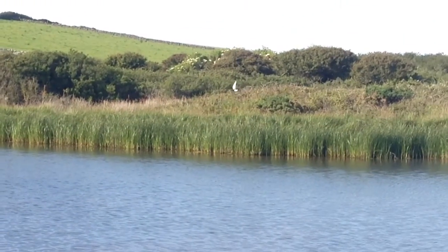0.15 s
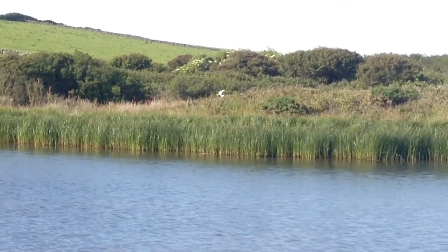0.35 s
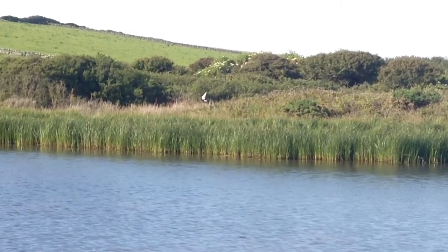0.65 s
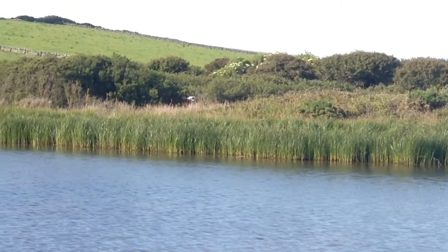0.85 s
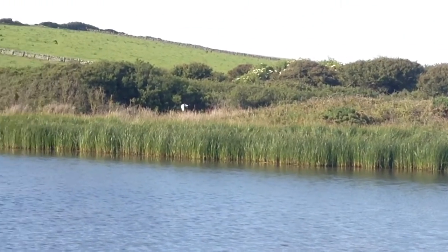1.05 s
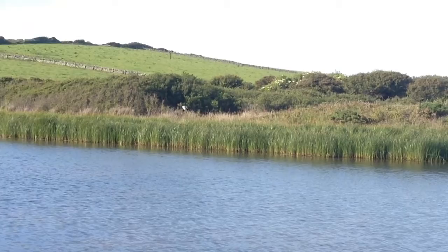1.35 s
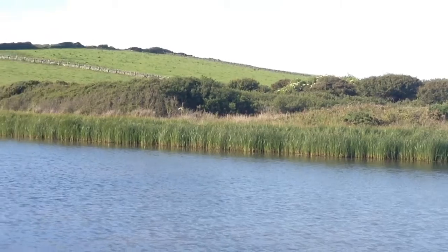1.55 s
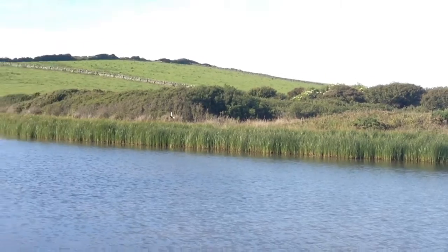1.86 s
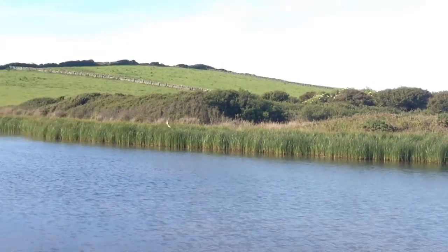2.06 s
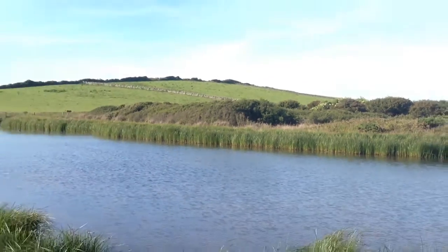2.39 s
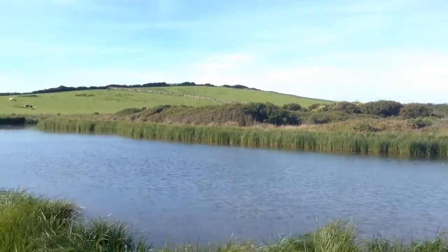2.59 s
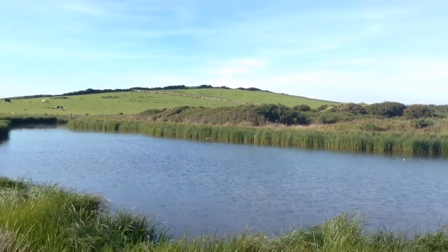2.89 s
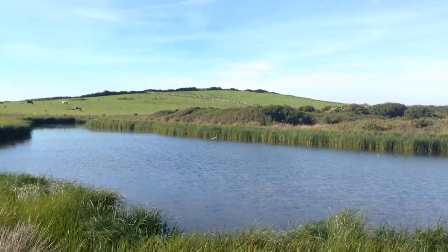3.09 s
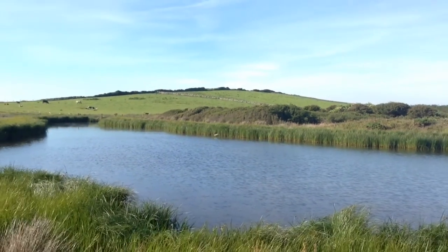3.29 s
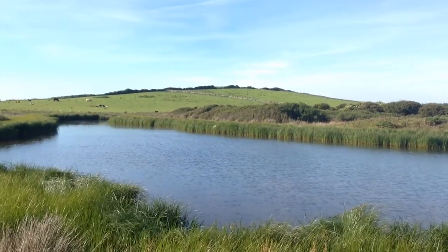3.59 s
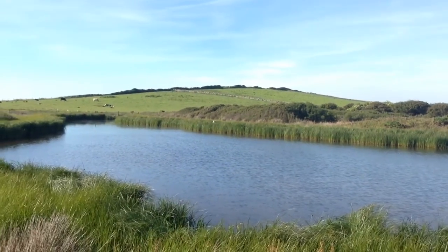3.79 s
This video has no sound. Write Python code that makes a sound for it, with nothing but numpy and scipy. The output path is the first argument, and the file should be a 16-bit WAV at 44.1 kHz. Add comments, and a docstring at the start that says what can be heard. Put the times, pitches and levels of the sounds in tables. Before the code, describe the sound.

Shore birds pipe rapid, shrill overlapping notes across a reedy lagoon, with faint wind rumble.

```python
"""Several shore birds pipe rapid arched notes over a reedy lagoon, overlapping one another: gliding near-sines.
Reeds and the hillside scatter the calls as a dying cloud of echoes, and farther birds pipe faintly behind.
Light wind rumbles on the microphone, with a wavering hum and a faint rustle and hiss: noise bands and a low tone.
The hand-held housing clicks and creaks a few times, in short gritty bursts of noise.
Later a farther bird trills higher up: a grainy whistle whose level pulses fast."""
import sys
import numpy as np
from scipy import signal
from scipy.io import wavfile

SR = 44100
rng = np.random.default_rng(int(sys.argv[2]) if len(sys.argv) > 2 else 0)


def materialize(psi):
    """Save the field psi as 16-bit PCM at rate SR to the path in sys.argv[1].

    A 1-D psi becomes a single channel; in a 2-D psi each row is a channel.
    """
    bounded = np.clip(np.atleast_2d(psi).T, -1, 1)
    quanta = np.round(bounded * 32767).astype(np.int16)
    wavfile.write(sys.argv[1], SR, quanta)


def gain_from_db(level_db):
    """Turn a decibel level (scalar or array-like) into a linear amplitude factor."""
    decades = np.asarray(level_db, float) / 20
    return 10 ** decades


N = 173754   # length of the scene [samples]

# Piped notes of the near birds: (start of the held top [s], top pitch [Hz], slide up [s], hold [s],
# slide down [s], level of the held first partial [dB rms], octave partial against the first [dB])
NOTES = [(-0.005, 3370, 0.008, 0.093, 0.018, -56.5, -13.5), (-0.01, 3100, 0.0079, 0.02, 0.02, -55, -8.5),
         (0.029, 3060, 0.008, 0.0035, 0.0079, -50.5, -15), (0.072, 3190, 0.016, 0.029, 0.018, -54, -14.5),
         (0.133, 3250, 0.014, 0.062, 0.02, -59.5, -11), (0.178, 3080, 0.014, 0.025, 0.035, -56.5, -32),
         (0.264, 3183, 0.0075, 0.03, 0.02, -51, -20.5), (0.356, 3165, 0.016, 0.037, 0.022, -57, -20),
         (0.397, 3240, 0.014, 0.049, 0.032, -64.5, -9), (0.4, 2850, 0.021, 0.063, 0.022, -62.5, -28),
         (0.509, 3216, 0.005, 0.035, 0.011, -61, -14), (0.524, 3150, 0.021, 0.045, 0.018, -60, -17),
         (0.638, 3210, 0.021, 0.043, 0.018, -60, -24), (0.698, 2655.0, 0.022, 0.011, 0.027, -66, -5),
         (0.748, 3205, 0.014, 0.028, 0.0066, -61.5, -12), (0.788, 3190, 0.014, 0.039, 0.03, -61, -8),
         (0.817, 2595.0, 0.011, 0, 0.01, -61, -18), (0.878, 3227, 0.012, 0.046, 0.015, -57, -14.5),
         (0.983, 3224, 0.015, 0.031, 0.026, -53.5, -11), (1.044, 3190, 0.014, 0.039, 0.035, -57.5, -19),
         (1.081, 2550, 0.008, 0.02, 0.015, -64, -11), (1.116, 3255, 0.012, 0.051, 0.019, -53.5, -9.5),
         (1.176, 3070, 0.017, 0.033, 0.015, -59, -13), (1.216, 2755.0, 0.02, 0.015, 0.034, -60.5, -13),
         (1.224, 3220, 0.014, 0.028, 0.015, -53, -4.5), (1.3, 3190, 0.023, 0.04, 0.015, -49.5, -9),
         (1.356, 3255, 0.014, 0.057, 0.016, -50.5, -4.5), (1.43, 3140, 0.0084, 0.033, 0.024, -51.5, -13),
         (1.471, 3250, 0.014, 0.021, 0.0092, -51.5, -5), (1.477, 2960, 0.025, 0, 0.029, -57, -11),
         (1.554, 3158, 0.033, 0.04, 0.014, -48.5, -12), (1.573, 3000, 0.018, 0.057, 0.023, -74, -2.0),
         (1.599, 3250, 0.014, 0.062, 0.012, -55, -11.5), (1.615, 3044, 0.022, 0.017, 0.038, -60.5, -7),
         (1.696, 3110, 0.012, 0.026, 0.008, -52, -17), (1.716, 3230, 0.008, 0.032, 0.025, -51, -19.5),
         (1.73, 3067, 0.012, 0.014, 0.008, -50, -14.5), (1.846, 2750, 0.014, 0.0067, 0.006, -68, -15),
         (1.874, 2740, 0.014, 0.043, 0.0081, -66, -22), (1.808, 3180, 0.03, 0.043, 0.022, -44, -14.5),
         (1.849, 3250, 0.014, 0.036, 0.03, -50, -29), (1.903, 2900.0, 0.012, 0.0068, 0.013, -68.5, -1),
         (1.946, 3186, 0.0074, 0.04, 0.057, -51.5, -18.5), (1.985, 2604, 0.015, 0.013, 0.041, -56.5, -8),
         (2.047, 2880, 0.012, 0.023, 0.008, -61.5, -13), (2.068, 3200, 0.026, 0.051, 0.015, -47.5, -14),
         (2.08, 3254, 0.014, 0.042, 0.026, -50.5, -11), (2.15, 2860, 0.005, 0.0043, 0.012, -59, -13),
         (2.128, 2870, 0.004, 0.008, 0.0058, -55, -16), (2.19, 3223, 0.008, 0.028, 0.0055, -50, -14.0),
         (2.213, 3095, 0.024, 0.04, 0.006, -57, -24), (2.267, 2806, 0.023, 0, 0.03, -51.5, -13.5),
         (2.314, 3143, 0.016, 0.043, 0.0051, -48.5, -11.5), (2.321, 3286, 0.014, 0.04, 0.015, -48, -10.5),
         (2.323, 2850.0, 0.016, 0.0019, 0.028, -60, -17), (2.393, 2885, 0.016, 0.0092, 0.025, -52.5, -20),
         (2.424, 3290, 0.007, 0.028, 0.0088, -53, -8.5), (2.44, 2246, 0.005, 0.018, 0.0074, -56, -17),
         (2.462, 3100, 0.0065, 0.039, 0.007, -55.5, -19), (2.519, 2890, 0.018, 0.0099, 0.031, -53, -14),
         (2.558, 3262, 0.01, 0.045, 0.008, -51.5, -11), (2.575, 3120, 0.024, 0.032, 0.013, -50.5, -11.5),
         (2.655, 2805, 0.021, 0.00061, 0.037, -50, -19), (2.668, 3280, 0.008, 0.033, 0.008, -54.5, -19),
         (2.705, 2485, 0.017, 0.0081, 0.021, -52.5, -17), (2.711, 3080, 0.011, 0.043, 0.005, -57.5, -15.5),
         (2.789, 2525.0, 0.019, 0.0047, 0.043, -55.5, -19), (2.809, 3350, 0.014, 0.033, 0.0102, -52, -14.5),
         (2.826, 3230, 0.014, 0.037, 0.015, -52, -14), (2.842, 2924, 0.021, 0.034, 0.015, -54.5, -31),
         (2.91, 2820, 0.012, 0.013, 0.027, -57, -19), (2.916, 3334, 0.014, 0.027, 0.036, -53.5, -12.0),
         (2.958, 2962, 0.021, 0, 0.031, -50.5, -27), (2.978, 3060, 0.007, 0.044, 0.021, -61, -20),
         (3.047, 3275, 0.014, 0.038, 0.035, -48, -19.5), (3.093, 2445, 0.021, 0.036, 0.0069, -60.5, -22),
         (3.12, 3200, 0.023, 0.018, 0.0084, -52, -40), (3.135, 3270, 0.015, 0.035, 0.019, -51, -13.5),
         (3.188, 3008, 0.015, 0.00048, 0.023, -48, -23), (3.262, 2600, 0.031, 0.003, 0.024, -56, -17),
         (3.275, 3050, 0.0055, 0.019, 0.006, -50.5, -19), (3.292, 3236, 0.005, 0.038, 0.008, -49, -20),
         (3.287, 3285, 0.008, 0.042, 0.02, -44.5, -17.5), (3.314, 3050, 0.011, 0, 0.006, -51, -23),
         (3.389, 3282, 0.014, 0.031, 0.019, -46, -13.5), (3.404, 3220, 0.022, 0.023, 0.0098, -41.5, -19),
         (3.421, 2880, 0.022, 0.0081, 0.012, -43.5, -31), (3.519, 3230, 0.028, 0.037, 0.0076, -44, -13.5),
         (3.556, 3368, 0.03, 0.11, 0.0063, -46.5, -19.5), (3.522, 3320, 0.012, 0.032, 0.015, -45, -17.5),
         (3.628, 3240, 0.013, 0.028, 0.0045, -49, -10), (3.654, 2960, 0.018, 0.0091, 0.006, -39.5, -24),
         (3.7, 2900, 0.004, 0.0039, 0.011, -47, -32), (3.668, 2560, 0.02, 0.0064, 0.012, -47, -16),
         (3.622, 2740, 0.025, 0.014, 0.026, -53, -32), (3.676, 3193, 0.006, 0.028, 0.004, -44, -15),
         (3.75, 3288, 0.019, 0.033, 0.0051, -42, -18), (3.765, 3200, 0.0087, 0.045, 0.011, -44.5, -17),
         (3.865, 3250, 0.012, 0.032, 0.012, -46.5, -12.5), (3.882, 3100, 0.013, 0.022, 0.0084, -39.5, -26),
         (3.906, 2403, 0.006, 0.019, 0.006, -52.5, -19), (3.93, 3245, 0.017, 0.0083, 0.01, -47, -13)]
SLIDE_DEPTH, SLIDE_CURVE = 0.3, 1.4   # share of the top pitch covered by a full slide, and its bend
FULL_SLIDE_S = 0.026                  # a shorter slide stops before it covers the whole depth
BOW, FULL_BOW_S = 0.0351, 0.031       # the hold is arched by this share once it lasts this long
SLIDE_LOSS_DB, OCTAVE_SLIDE_LOSS_DB = 15, 8.5   # loss at the foot of a full slide: odd partials, octave
FOOT = 0.13                           # part of the slide over which the note fades in or out
WOBBLE, FLUTTER_DB = 0.0048, 1.05     # unsteadiness of the pitch (share) and of the level
THIRD_DB = -39                        # third partial against the first
# Notes held above HIGH_REGISTER_HZ snap into their top: slides are weaker and jump across a gap.
# (time [s], slide loss [dB], jump [share of the slide], slide depth [share of the top pitch],
# sag at the end of the hold [share of the top pitch])
SNAP = [(0, 5.4, 0.42, 0.35, 0.028), (1.2, 11, 0.42, 0.35, 0.011), (1.999, 11.2, 0.44, .36, .015),
        (2.6, 4.7, 0.29, 0.36, 0.044), (3.2, 7.6, 0.327, .4, .075), (3.94, 5.7, 0.34, 0.39, 0.071)]
HIGH_REGISTER_HZ = 3040
SNAP_S, SAG_S = 0.0012, 0.00879       # time constants of the snap, and of the sag before the hold ends
SLIDE_FLUTTER_DB = 3                  # the slides of all notes are broken and uneven

# Echoes weaken as the birds come nearer: (time [s], level against the direct calls [dB])
SCATTER = [(0, -11), (2, -14.5), (3.2, -21), (3.94, -26)]
SCATTER_T60_S, SCATTER_DELAY_S = 0.15, 0.016   # time to die by 60 dB, and wait before the first echo

# Farther birds piping at loose intervals
FLOCK_PER_S, FLOCK_LOW_HZ, FLOCK_HIGH_HZ = 28, 2296, 2900
FLOCK_DB, FLOCK_SPREAD_DB, FLOCK_SCATTER_DB = -69, 9, -11   # middle level, spread either way, echoes

# Wind on the microphone, its strength: (time [s], level [dB rms])
GUST = [(0, -63), (.3, -66), (.58, -55.5), (.75, -65.5), (1.05, -58), (1.45, -57), (1.6, -54),
        (1.72, -58.5), (1.84, -55.5), (1.95, -62.5), (2.15, -60), (2.27, -59), (2.45, -62.5), (2.9, -62),
        (3.4, -62.5), (3.94, -63)]
# Wind on the microphone, its relative spectrum: (frequency [Hz], level per Hz [dB])
WIND = [(12, -53), (20, -26.5), (54, 0.5), (75, 3.5), (107, 0.5), (139, -11.5), (178, -16), (274, -27),
        (300, -14.5), (390, -61), (660, -120)]

# Strength of a low wavering hum: (time [s], level [dB rms])
HUM = [(0.0, -70), (0.31, -65.5), (0.48, -61), (1.66, -58.5), (2.48, -84), (2.64, -66.5), (3.92, -81),
       (3.94, -81)]
HUM_HZ, HUM_WAVER_HZ, HUM_THROB_DB = 74, 4.84, 1   # middle pitch, spread of pitch, spread of level

# Distant rustle and microphone hiss, relative spectrum: (frequency [Hz], level per Hz [dB])
AIR = [(120, -27), (200, -8.5), (400, -4.5), (800, -9.5), (1500, -14), (2500, -6), (3600, -15),
       (6300, -15.5), (9000, -17), (15500, -18.5)]
AIR_DB = -64.5   # rms

# Clicks of the housing: (time [s], peak level [dB], centre of the band [Hz], width of the band [octaves],
# time to die by 60 dB before the band filter [s])
CLICKS = [(.885, -50.5, 1760, 0.71, 0.0098), (.951, -39, 1920, 1.35, 0.048), (0.959, -44, 2180, 2.6, 0.027),
          (0.965, -37.5, 1560, 1.5, 0.055), (.967, -46, 700, 2.2, 0.037), (1.003, -45.5, 1800, 1.4, 0.2),
          (1.028, -38.5, 1890, 2.1, 0.034), (1.029, -38, 3200, 0.24, 0.015), (1.029, -51, 7900, 2.2, 0.048),
          (1.036, -43, 2200, 3.3, 0.035), (1.047, -47, 1130, 2, 0.13), (1.186, -48, 2000, 1.6, 0.072),
          (1.249, -48.5, 1420, 2.6, 0.048), (1.263, -43.5, 1710, 0.47, 0.028),
          (2.146, -48.5, 3160, 1.6, 0.074), (3.044, -40, 3770, 0.47, 0.024), (2.245, -57, 167, 0.54, 0.024),
          (3.06, -57.5, 357, 0.8, 0.043), (3.251, -51, 353, 0.42, 0.028)]
CLICK_ATTACK_S = 0.00071   # time constant of the onset

# Trills of the farther bird: (start [s], length [s], first pitch [Hz], last pitch [Hz],
# level before the pulsing and fading [dB rms])
TRILLS = [(2.684, .062, 4130, 3700, -66.5), (2.774, 0.026, 3940, 4020, -70), (2.94, 0.022, 3650, 3720, -71),
          (2.988, 0.055, 3760, 4000, -70.5)]
TRILL_PER_S, TRILL_DEPTH, TRILL_JITTER_HZ = 75, 0.9, 70   # pulses per second, their depth, pitch spread

CUTOFF_HZ = 15300   # top of the finished sound


def rms_one(x):
    """Scales to rms 1."""
    return x / np.sqrt(np.mean(x ** 2) + 1e-20)


def drift(rate):
    """Wandering chance with spread 1: noise smoothed twice so that little is left above rate, in Hz."""
    r = np.exp(-16 * np.pi * rate / SR)
    # Every eighth sample is enough; the first 4000 let the smoothing settle.
    noise = rng.standard_normal(N // 8 + 4002)
    slow = signal.lfilter([1], [1, -2 * r, r * r], noise)[4000:]
    return np.interp(np.arange(N) / 8, np.arange(len(slow)), rms_one(slow - slow.mean()))


def follow(table):
    """Joins the (time, value) points of a table by straight lines over the scene."""
    return np.interp(np.arange(N) / SR, *np.transpose(table))


def band(x, low_hz, high_hz):
    """Keeps the sound between two frequencies (Butterworth band-pass)."""
    edges = [low_hz, min(high_hz, 0.45 * SR)]
    return signal.sosfilt(signal.butter(2, edges, "band", fs=SR, output="sos"), x)


def banded_noise(spectrum, edges, shared_db, own_db, rate, calm_hz):
    """Noise bands flickering partly together and partly alone, ever steadier above calm_hz; rms 1."""
    hz, db = np.transpose(spectrum)
    white = rng.standard_normal((2, N + SR))   # neighbouring bands use different noise
    together, out = drift(rate), 0
    for k, (low, high) in enumerate(zip(edges, edges[1:])):
        level = np.interp(np.log(low * high) / 2, np.log(hz), db)
        flicker = shared_db * together + own_db * drift(rate)
        flicker = flicker / (1 + (low / calm_hz) ** 2)
        settled = band(white[k % 2], low, high)[SR:]
        out = out + gain_from_db(level + flicker) * settled
    return rms_one(out)


def add(out, start, sound):
    """Mixes a sound in at a sample index, cut to the scene."""
    a, b = max(start, 0), min(start + len(sound), N)
    out[a:b] += sound[a - start:b - start]


def piping(notes):
    """Each note slides up, holds on an arch and slides down; nearly a sine with its octave."""
    out, wobble, broken = np.zeros(N), drift(68.0), drift(153.0)
    flutter, octave_flutter = drift(37.0), drift(42.0)
    snap_s, *snap = np.transpose(SNAP)
    turns = rng.random((len(notes), 2))   # starting phases
    for (s, hz, rise, hold, fall, db, octave_db), turn in zip(notes, turns):
        rise, hold, fall = max(rise, 0.003), max(hold, 0), max(fall, 0.003)
        first = int((s - rise) * SR)
        i = np.arange(first, int((s + hold + fall) * SR))
        t = i / SR - s   # 0 where the held top starts
        at = np.clip(i, 0, N - 1)

        # How far from the top: 0 on the hold, towards 1 at the foot of a slide
        gone = np.clip(np.maximum(-t / rise, (t - hold) / fall), 0, 1)
        slid = gone * np.minimum(np.where(t < 0, rise, fall) / FULL_SLIDE_S, 1)
        outside_s = np.maximum(0, np.maximum(-t, t - hold))
        off = 1 - np.exp(-outside_s / SNAP_S)

        # The snap values are all zero for the lower notes.
        snap_db, jump, depth, sag = [np.interp(s, snap_s, c) * (hz > HIGH_REGISTER_HZ) for c in snap]
        arch = np.clip(2 * t / max(hold, 1e-3) - 1, -1, 1) ** 2
        arch = arch * BOW * min(hold / FULL_BOW_S, 1)
        sink = sag * np.exp(-np.maximum(hold - t, 0) / SAG_S)
        slide = (depth or SLIDE_DEPTH) * (jump * off + (1 - jump) * slid ** SLIDE_CURVE)
        pitch = hz * (1 - arch - sink - slide + WOBBLE * wobble[at])
        phase = 2 * np.pi * (np.cumsum(pitch) / SR + turn[0])

        odd_level = gain_from_db(FLUTTER_DB * flutter[at] - SLIDE_LOSS_DB * slid)
        tone = odd_level * (np.sin(phase) + gain_from_db(THIRD_DB) * np.sin(3 * phase))
        octave_level = gain_from_db(octave_db + FLUTTER_DB * octave_flutter[at] - OCTAVE_SLIDE_LOSS_DB * slid)
        tone += octave_level * np.sin(2 * phase + 2 * np.pi * turn[1])
        slide_db = off * (SLIDE_FLUTTER_DB * broken[(at + first) % N] - snap_db)
        fade = np.clip((1 - gone) / FOOT, 0, 1)
        add(out, first, np.sqrt(2) * gain_from_db(db + slide_db) * fade * tone)
    return out


def scatter(x, level_db):
    """Reeds, bushes and slope return a dying cloud of small echoes."""
    t = np.arange(SR // 2) / SR
    dying = gain_from_db(-60 * t / SCATTER_T60_S)
    cloud = rng.standard_normal(len(t)) * dying * (t > SCATTER_DELAY_S)
    cloud = cloud / np.sqrt(np.sum(cloud ** 2))
    return gain_from_db(level_db) * signal.fftconvolve(x, cloud)[:N]


def flock():
    """Short notes from farther birds at loose intervals and random pitches, half lost in echoes."""
    notes = []
    chances = rng.random((200, 4))[:int(FLOCK_PER_S * N / SR)]
    for k, (when, length, height, loudness) in enumerate(chances):
        s = (k + when) / FLOCK_PER_S
        hz = FLOCK_LOW_HZ + (FLOCK_HIGH_HZ - FLOCK_LOW_HZ) * height
        db = FLOCK_DB + FLOCK_SPREAD_DB * (2 * loudness - 1)
        notes.append((s, hz, 0.016, 0.0145 * length, 0.024, db, -13))
    far = piping(notes)
    return far + scatter(far, FLOCK_SCATTER_DB)


def wind():
    """Wind on the microphone: low noise in third-octave bands that swells and sinks with the gusts."""
    edges = 20 * 2 ** (np.arange(14) / 3)
    rumble = banded_noise(WIND, edges, shared_db=1.2, own_db=1.5, rate=6.0, calm_hz=900)
    return gain_from_db(follow(GUST)) * rumble


def hum():
    """A low tone whose pitch and level waver."""
    level_db = follow(HUM) + HUM_THROB_DB * drift(9.3)
    pitch = HUM_HZ + HUM_WAVER_HZ * drift(4.01)
    return np.sqrt(2) * gain_from_db(level_db) * np.sin(2 * np.pi * np.cumsum(pitch) / SR)


def air():
    """Distant rustle and microphone hiss: third-octave noise bands, the lower ones flickering most."""
    edges = 150 * 2 ** (np.arange(21) / 3)
    return gain_from_db(AIR_DB) * banded_noise(AIR, edges, shared_db=3.0, own_db=2.05, rate=4.2, calm_hz=920)


def housing():
    """Each click is a gritty burst with a sharp head, dying fast in the band where the plastic shell rings."""
    out, t = np.zeros(N), np.arange(SR // 4) / SR
    grit = rng.random((len(CLICKS), 2, len(t)))
    for (s, db, hz, octaves, t60), (sign, size) in zip(CLICKS, grit):
        # Random signs and very uneven sizes make the grit.
        snaps = np.sign(sign - 0.5) * gain_from_db(-2.5 * np.log(size + 0.03))
        snaps = snaps * (1 - np.exp(-t / CLICK_ATTACK_S)) * gain_from_db(-60 * t / t60)
        burst = band(snaps, hz * 2 ** (-octaves / 2), hz * 2 ** (octaves / 2))
        add(out, int(s * SR), gain_from_db(db) * burst / np.abs(burst).max())
    return out


def trills():
    """A gliding, grainy whistle chopped at the trill rate."""
    out, jitter = np.zeros(N), TRILL_JITTER_HZ * drift(150.0)
    for s, length, first_hz, last_hz, db in TRILLS:
        first = int(s * SR)
        t = np.arange(int(length * SR)) / SR
        chop = 1 - TRILL_DEPTH * np.cos(2 * np.pi * TRILL_PER_S * t)
        fade = np.sin(np.pi * t / length) ** 0.29
        pitch = np.interp(t, [0, length], [first_hz, last_hz]) + jitter[first:][:len(t)]
        whistle = np.sin(2 * np.pi * np.cumsum(pitch) / SR)
        add(out, first, np.sqrt(2) * gain_from_db(db) * chop * fade * whistle)
    return out


def scene():
    """Near birds with their echoes, farther birds, wind, hum, air and handling, in one channel."""
    birds = piping(NOTES) + trills()
    echoes = scatter(birds, follow(SCATTER))
    mix = birds + echoes + flock() + wind() + hum() + air() + housing()
    return mix[None]


def roll_off(x):
    """The treble ends steeply here."""
    return signal.sosfilt(signal.butter(12, 15760, fs=SR, output="sos"), x)


def record(dry):
    """A steep low-pass cuts the top of the treble."""
    low_pass = signal.ellip(12, 0.5, 70, CUTOFF_HZ, fs=SR, output="sos")
    mix = signal.sosfilt(low_pass, dry)
    return roll_off(mix)


dry = scene()
out = record(dry)
materialize(out)
```